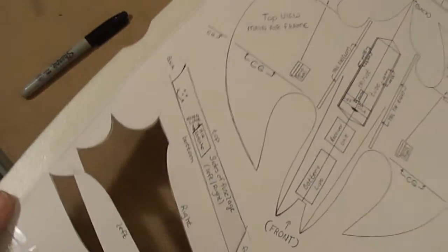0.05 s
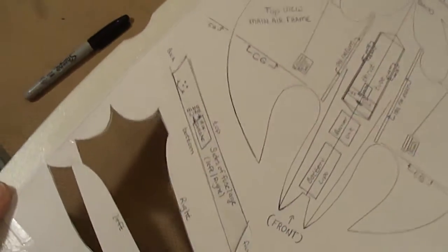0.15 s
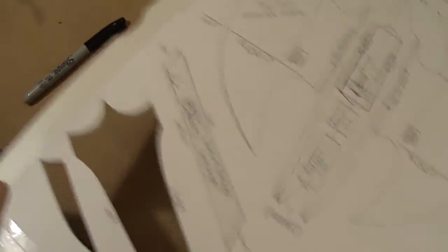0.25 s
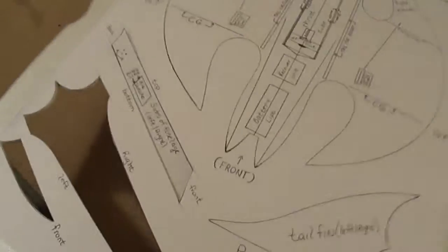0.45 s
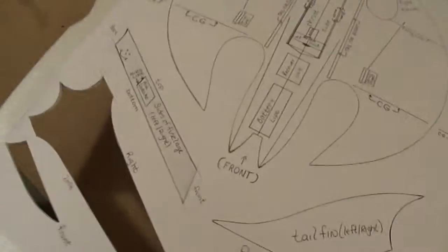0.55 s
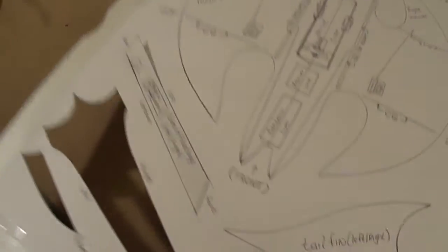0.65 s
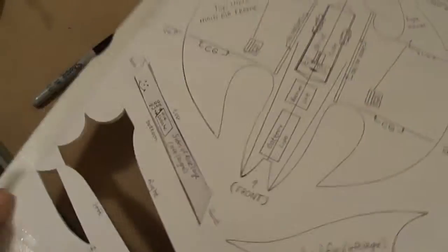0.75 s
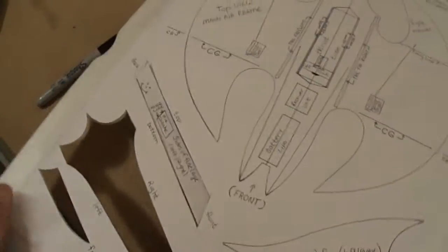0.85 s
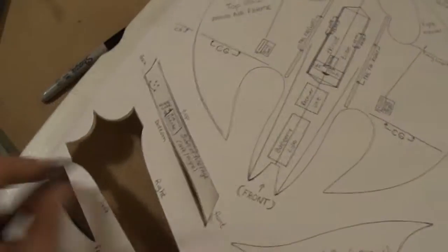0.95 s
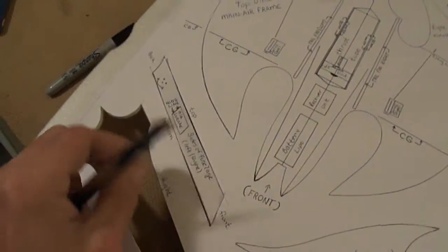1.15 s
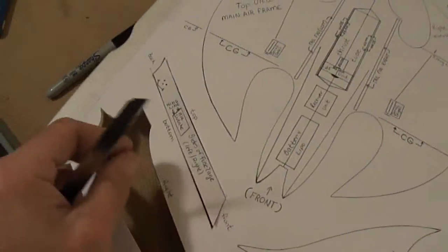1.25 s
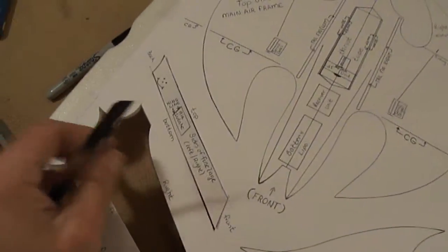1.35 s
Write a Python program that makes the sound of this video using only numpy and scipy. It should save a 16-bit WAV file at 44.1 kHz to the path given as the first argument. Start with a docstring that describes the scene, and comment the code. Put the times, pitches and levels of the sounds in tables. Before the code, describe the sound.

A foam board with paper on top is slid across a worktable, rubbing, tapping and scraping from about 0.1 seconds, with a brief squeak near 0.3. At about 0.4 it drops with a hollow thump and a short hard clatter, then knocks more lightly. From 0.6 to 1.2 seconds, softer scrapes, taps and paper crackles fade as a razor knife is picked up, over a small room's steady hush.

```python
"""A small room with a steady hush: a foam board, paper plans on top, is slid and handled on a worktable.
The board rubs and knocks on the table, scrapes and squeaks by stick-slip, then drops with a hollow
thump (a damped flex plus ringing modes) and a short hard clatter. Softer scrapes and paper crackles,
clumps of tiny snaps, follow as a razor knife is picked up."""
import sys
import numpy as np
from scipy import signal
from scipy.fft import rfft, irfft, next_fast_len
from scipy.io import wavfile
from scipy.ndimage import map_coordinates

SR = 44100
rng = np.random.default_rng(int(sys.argv[2]) if len(sys.argv) > 2 else 0)


def generate_wav(sig):
    """Save sig (samples, or channels by samples) to the path in sys.argv[1] as 16-bit PCM at SR."""
    pcm = np.round(np.clip(np.atleast_2d(sig).T, -1, 1) * 32767).astype(np.int16)
    wavfile.write(sys.argv[1], SR, pcm)


N = 61739

# room decay: freq_hz, t60_s
ROOM_DECAY = [(150, 0.19), (700, 0.6), (3000, 0.39), (10000, 0.57)]
# room hush spectrum: freq_hz, level_db
HUSH_SPECTRUM = [(15, -44), (25, -17.5), (124, -11), (234, -7), (378, -4.5), (629, 2), (853, -4.5),
                 (1350, -6), (1650, -6.5), (2420, -13.5), (3040, -14.5), (4220, -13), (4560, -20),
                 (5450, -19), (10800, -30.5), (14100, -83), (22000, -120)]
# board rubbing on the table: time_s, level_db
RUB_ENVELOPE = [(0, -61), (.135, -62), (0.159, -40), (0.174, -52.5), (0.188, -41.5), (0.236, -39.5),
                (.26, -54.5), (.39, -49), (0.422, -73), (0.431, -38), (0.479, -40.5), (.51, -47.5),
                (0.547, -43), (.58, -55), (0.851, -60.5), (1.4, -60)]
# rub spectrum: freq_hz, level_db
RUB_SPECTRUM = [(30, -49), (60, -35), (90, 3), (130, 6), (220, 3), (450, 4), (800, 0.5), (1300, -1.5),
                (3000, -9.5), (9000, -38)]
# paper crackles: start_s, length_s, level_db, tilt_db_per_oct, resonance_hz
PAPER_CRACKLES = [(0.062, 0.012, -52.5, 3, 3860), (0.209, 0.0041, -43, 6, 2960),
                  (0.257, 0.008, -46.5, 4.5, 3180), (0.283, 0.024, -40.5, 2, 4650),
                  (0.401, 0.007, -34, 2, 3500), (0.538, 0.0084, -41.5, -0.5, 5000),
                  (0.576, 0.0052, -48, 5, 3470), (0.592, 0.0096, -41.5, 0, 2950),
                  (0.623, 0.0016, -48.5, 5.5, 3960), (0.665, 0.009, -47.5, 2, 2770),
                  (0.711, 0.021, -46, 0.5, 1530), (0.7465, 0.0017, -39, -0.5, 3230),
                  (0.76, 0.0017, -38.5, 1, 3360), (0.7914, 0.003, -37, 2.5, 1220),
                  (0.8025, 0.004, -36.5, -2.5, 1690), (0.808, 0.0066, -39.5, 1, 4830),
                  (0.829, 0.026, -52, 3, 6450), (0.893, 0.0052, -49.5, 3, 4500),
                  (0.931, 0.0092, -43.5, 0.5, 4350), (0.9907, 0.0016, -33.5, -0.5, 3930),
                  (0.9949, 0.003, -37.5, 4, 8900), (1.033, 0.0028, -50, -4, 4200),
                  (1.071, 0.0075, -50, 2, 4400), (1.109, 0.0097, -50.5, 0, 4000),
                  (1.144, 0.002, -50, -1, 4000), (1.17, 0.022, -50, 0.5, 4500)]
# paper snap spectrum, also used for the clatter's cracks: freq_hz, level_db
SNAP_SPECTRUM = [(200, -17), (700, 3), (1500, 9), (2500, 2.5), (4000, 2), (5500, -2), (7000, -9.5),
                 (9000, -12.5), (11000, -29.5)]
# foam squeaks and groans: start_s, level_db, pitch_hz, swell_s, waver_rad
FOAM_SQUEAKS = [(.058, -42.5, 1035, 0.0057, 0.45), (0.139, -47.5, 138.7, 0.02, 0.65),
                (0.17, -40, 118, 0.0077, 0.62), (0.2837, -24, 1140, 0.0035, 1.3),
                (.287, -34, 2012, .007, .5), (.432, -24.5, 263.7, 0.005, 0.35),
                (.462, -28.5, 487, 0.0024, 0.7), (0.471, -41.5, 139.4, 0.013, 1.2),
                (.545, -32, 656, 0.0047, 1.1), (.763, -31.5, 935, 0.0082, 1.13),
                (.995, -48.5, 1450, .011, 0.61), (.998, -40, 4000, .002, 0.15),
                (1.182, -42.5, 1094, 0.011, 1.2)]
# scraping strokes: start_s, length_s, level_db, change_db, tilt_db_per_oct
SCRAPE_STROKES = [(0.282, 0.033, -31.5, -6, 1.8), (0.316, 0.056, -37.5, 5, 0.5),
                  (0.371, 0.028, -38.5, -3.5, 1), (0.392, 0.052, -42, 7, 3), (0.442, 0.0091, -36.5, 6, 1),
                  (0.462, 0.028, -40.5, -3.5, 4.5), (0.732, 0.041, -38.5, 0, 0),
                  (0.779, 0.019, -43.5, 2, -7), (0.814, 0.058, -48.5, 0, -2.9),
                  (0.918, 0.019, -42.5, 0.5, 0), (0.945, 0.038, -45, 0, -1.5), (0.989, 0.17, -50.5, -1, -5),
                  (1.163, 0.047, -46, -2, -1.5)]
# scrape spectrum: freq_hz, level_db
SCRAPE_SPECTRUM = [(59, -50), (100, -27), (170, -22), (195, -33), (288, -9), (324, -13.5), (350, -14),
                   (470, -10), (710, -2.5), (1410, -10.5), (1750, -12.5), (2910, -9), (10800, -35),
                   (14100, -105), (22000, -120)]
# contacts of a hard, light object: start_s, level_db
CLATTER_HITS = [(0.4269, -25.5), (0.4359, -23.5), (.4410, -16.5), (.4455, -21.5), (0.4482, -21),
                (0.449, -45)]
# modes of that object: freq_hz, level_db, t60_s
OBJECT_MODES = [(1620, -10.5, 0.068), (1822, -5, 0.023), (1884, -5, 0.049), (2660, -17, 0.024),
                (3080, -10, 0.016), (3460, -22, 0.077), (5970, -18.5, 0.033), (7530, -22.5, 0.031)]
# board contacts with the table: start_s, level_db, pitch_hz, swell_s
BOARD_KNOCKS = [(.1520, -33.5, 780, 0.0021), (.1838, -29.5, 765, 0.00034), (0.195, -31.5, 490, 0.00083),
                (0.2198, -26.5, 836, 0.00082), (0.2390, -19, 560, 0.00062), (.3375, -30, 1000, 0.00055),
                (.3565, -26.5, 950, .0005), (.3685, -28.5, 654, 0.0012), (0.4274, -7, 558, 0.0012),
                (.5304, -17.5, 615, 0.00064), (.5890, -30.5, 864, 0.0003), (0.7176, -32, 780, 0.00028),
                (.7340, -25.5, 860, 0.0004), (.7370, -24.5, 710, 0.00093), (.7525, -32, 950, 0.00058),
                (0.7582, -25, 930, 0.0006), (0.7875, -32, 760, 0.00055), (0.9923, -27, 1010, 0.00043)]
# board modes: freq_hz, level_db, t60_s
FOAM_BOARD_MODES = [(115, -28, 0.23), (172, -22, 0.26), (265, -23, 0.046), (454, -38, 0.22),
                    (592, -19, 0.16), (701.5, -20, 0.086), (772, -21.5, 0.11), (930, -17, 0.036),
                    (1050, -21, 0.041)]


def amp(db):
    """Decibels to gain."""
    return 10 ** (np.asarray(db) / 20)


def unit_rms(x):
    """Scale to rms 1."""
    return x / np.sqrt(np.mean(x ** 2) + 1e-20)


def log_interp(points, hz):
    """Read (freq_hz, value) points on a log frequency axis."""
    freqs_hz, values = np.transpose(points)
    return np.interp(np.log(hz + 1), np.log(freqs_hz + 1), values)


def since(start_s):
    """Seconds since start_s, zero before."""
    return np.maximum(np.arange(N) / SR - start_s, 0)


def coloured(x, spectrum, tilt_db_per_oct=0):
    """Minimum-phase filter to a spectrum, tilted above 400 Hz; rms 1."""
    size = 2 * next_fast_len(N // 2 + 4096)
    hz = np.fft.rfftfreq(size, 1 / SR)
    gain_db = log_interp(spectrum, hz) + tilt_db_per_oct * np.log2(np.maximum(hz, 400) / 2000)
    cepstrum = irfft(np.log(amp(gain_db)))
    cepstrum[1:size // 2] *= 2
    cepstrum[size // 2 + 1:] = 0
    return unit_rms(irfft(rfft(x, size) * np.exp(rfft(cepstrum)), size)[:N])


def impulses(per_s, scatter_db):
    """Slips or snaps of uneven size at random times; rms 1."""
    sizes = amp(scatter_db * np.clip(rng.standard_normal(N), -2, 2))
    signs = np.sign(rng.standard_normal(N))
    return unit_rms(sizes * signs * (rng.random(N) < per_s / SR))


def stroke(start_s, length_s, attack_s, release_s):
    """Attack, hold, release envelope."""
    return (1 - np.exp(-since(start_s) / attack_s)) * np.exp(-since(start_s + length_s) / release_s)


def swell(t, peak_s):
    """Envelope rising to 1 at peak_s, then dying."""
    return t / peak_s * np.exp(1 - t / peak_s)


def ring(modes, start_s, scatter_db=1.5):
    """Struck modes; levels vary per strike."""
    t = since(start_s)
    live = (t > 0) & (t < .3)
    out, t = np.zeros(N), t[live]
    for hz, db, t60_s in modes:
        strike_db = db + scatter_db * rng.standard_normal()
        out[live] += amp(strike_db - 60 * t / t60_s) * np.sin(2 * np.pi * hz * t)
    return out


def paper_patch(resonance_hz, height_db=5, width_oct=0.24):
    """Spectrum of a patch of paper with one broad resonance."""
    hz = np.geomspace(100, 16000, 90)
    peak_db = height_db * np.exp(-(np.log2(hz / resonance_hz) / width_oct) ** 2)
    return np.transpose([hz, log_interp(SNAP_SPECTRUM, hz) + peak_db])


def room(x, onset_s=0.00062):
    """Small-room reverb: a noise tail, longest in the midrange."""
    hz, t, bands = signal.stft(rng.standard_normal(SR // 2), SR, nperseg=256)
    decay = amp(-60 * t / log_interp(ROOM_DECAY, hz)[:, None])
    tail = signal.istft(bands * decay, SR, nperseg=256)[1]
    tail *= 1 - np.exp(-np.arange(len(tail)) / SR / onset_s)
    return signal.fftconvolve(x, tail / np.linalg.norm(tail))[:N]


def background(hush_db=-51, ticks_db=-61.5):
    """Room hush and stray paper ticks."""
    hush = coloured(rng.standard_normal(N), HUSH_SPECTRUM)
    snaps = impulses(per_s=75, scatter_db=4)
    ticks = coloured(snaps, paper_patch(resonance_hz=4240), tilt_db_per_oct=0.5)
    return amp(hush_db) * hush + amp(ticks_db) * ticks


def rub():
    """Dull, uneven slips of the board on the table."""
    level_db = np.interp(np.arange(N) / SR, *np.transpose(RUB_ENVELOPE))
    return amp(level_db) * coloured(impulses(per_s=3000, scatter_db=5), RUB_SPECTRUM)


def crackles():
    """Paper gives way in clumps of snaps, each in a patch with its own resonance."""
    out = np.zeros(N)
    for start_s, length_s, db, tilt_db_per_oct, resonance_hz in PAPER_CRACKLES:
        envelope = amp(db) * stroke(start_s, length_s, attack_s=0.00056, release_s=0.0047)
        snaps = impulses(per_s=6500, scatter_db=1.5)
        out += envelope * coloured(snaps, paper_patch(resonance_hz), tilt_db_per_oct)
    return out


def squeaks(wavers_per_cycle=0.34):
    """Slipping foam: brief friction tones with wavering phase."""
    out = np.zeros(N)
    for start_s, db, hz, swell_s, waver_rad in FOAM_SQUEAKS:
        t = since(start_s)
        cycles = np.arange(N) / SR * hz
        waver = map_coordinates(rng.standard_normal(4096), [cycles * wavers_per_cycle])
        out += amp(db) * swell(t, swell_s) ** 2 * np.sin(2 * np.pi * hz * t + waver_rad * waver)
    return out


def scrapes():
    """Dense stick-slip of foam and paper."""
    out = np.zeros(N)
    for start_s, length_s, db, change_db, tilt_db_per_oct in SCRAPE_STROKES:
        level_db = db + change_db * np.minimum(since(start_s) / length_s, 1)
        envelope = amp(level_db) * stroke(start_s, length_s, attack_s=0.0036, release_s=0.0085)
        slips = impulses(per_s=3800, scatter_db=1.5)
        out += envelope * coloured(slips, SCRAPE_SPECTRUM, tilt_db_per_oct)
    return out


def clatter(crack_db=-9, crack_t60_s=0.03):
    """Quick hard contacts, each a short ring and a noise crack."""
    out = np.zeros(N)
    for start_s, db in CLATTER_HITS:
        t = since(start_s)
        ringing = ring(OBJECT_MODES, start_s)
        envelope = (t > 0) * amp(crack_db - 60 * t / crack_t60_s)
        crack = envelope * coloured(rng.standard_normal(N), SNAP_SPECTRUM)
        out += amp(db) * (ringing + crack)
    return out


def flex(start_s, hz, swell_s, cut_hz=198):
    """Heavily damped swing of the foam; below cut_hz, air slips round the thin board."""
    t = since(start_s)
    swing = swell(t, swell_s) ** 1.64 * np.sin(2 * np.pi * hz * t)
    return signal.sosfilt(signal.butter(2, cut_hz, 'highpass', fs=SR, output='sos'), swing)


def knocks(corner_cycles=0.22):
    """Each contact flexes the board and rings its modes; brief contacts miss the low ones."""
    out = np.zeros(N)
    for start_s, db, pitch_hz, swell_s in BOARD_KNOCKS:
        modes = []
        for hz, mode_db, t60_s in FOAM_BOARD_MODES:
            loss_db = 20 * np.log10(1 + (corner_cycles / (hz * swell_s)) ** 2)
            modes.append((hz, mode_db - loss_db, t60_s))
        out -= amp(db) * (flex(start_s, pitch_hz, swell_s) + ring(modes, start_s))
    return out


def scene():
    """Direct sound, reverb and background; mono."""
    board = knocks()
    friction = squeaks() + scrapes() + rub()
    paper = crackles()
    hard_object = clatter()
    reverb = room(amp(-19.5) * board + amp(-8.5) * (friction + paper) + amp(-18.5) * hard_object)
    return (board + friction + paper + hard_object + reverb + background())[None]


def record(dry, low_cut_hz=54, top_hz=11100):
    """Bass roll-off and a hard treble limit."""
    thinned = signal.sosfilt(signal.butter(4, low_cut_hz, 'highpass', fs=SR, output='sos'), dry)
    size = next_fast_len(N + SR // 4)
    passband = np.fft.rfftfreq(size, 1 / SR) < top_hz
    return irfft(rfft(thinned, size) * passband, size)[:, :N]


dry = scene()
out = record(dry)
generate_wav(out)
```